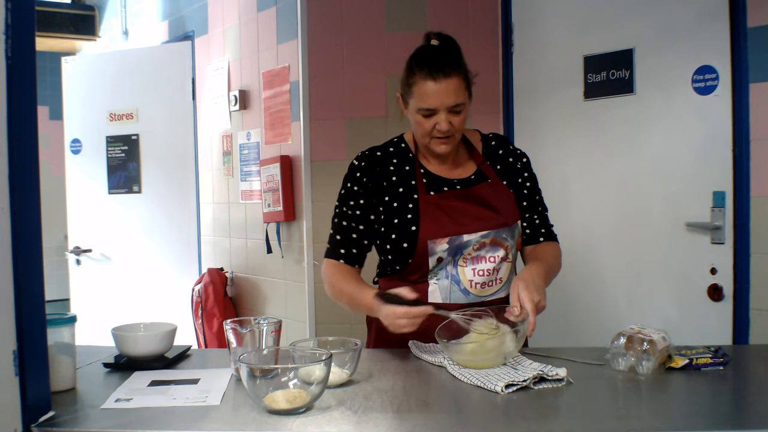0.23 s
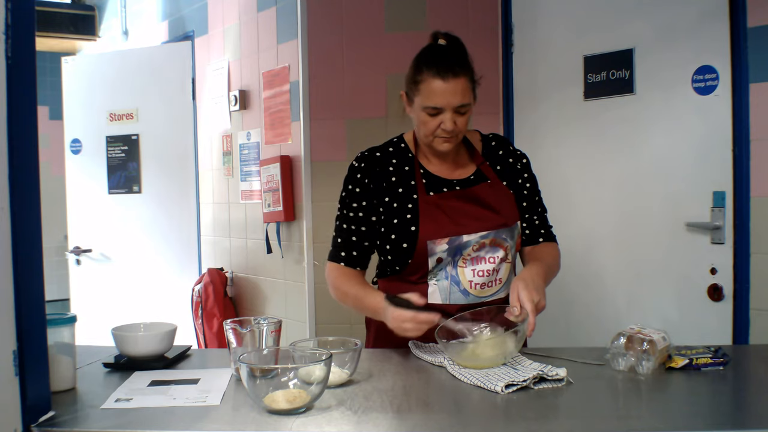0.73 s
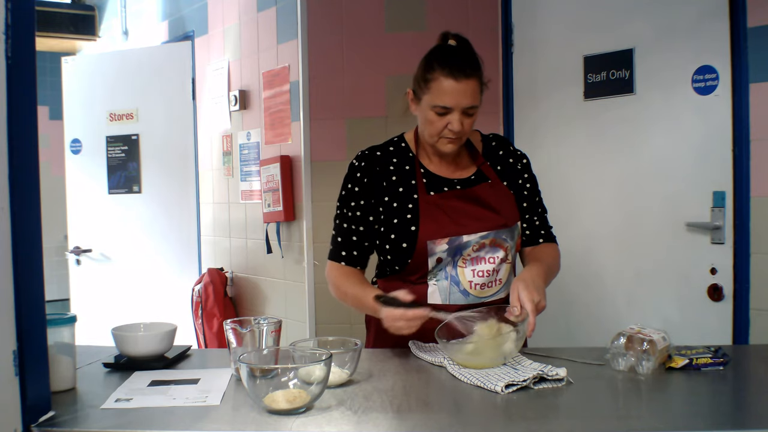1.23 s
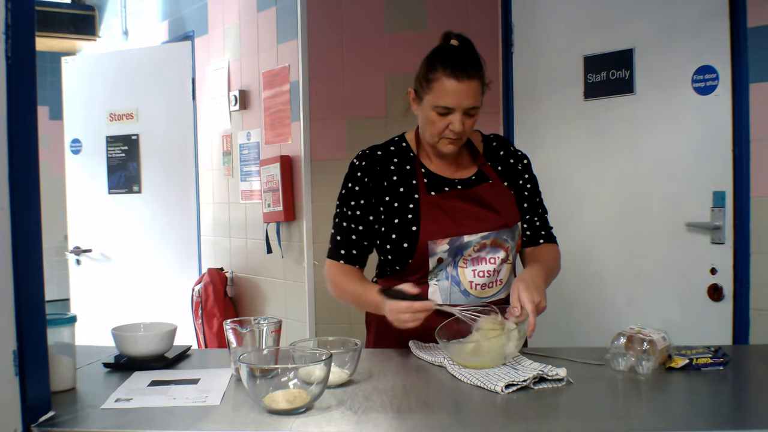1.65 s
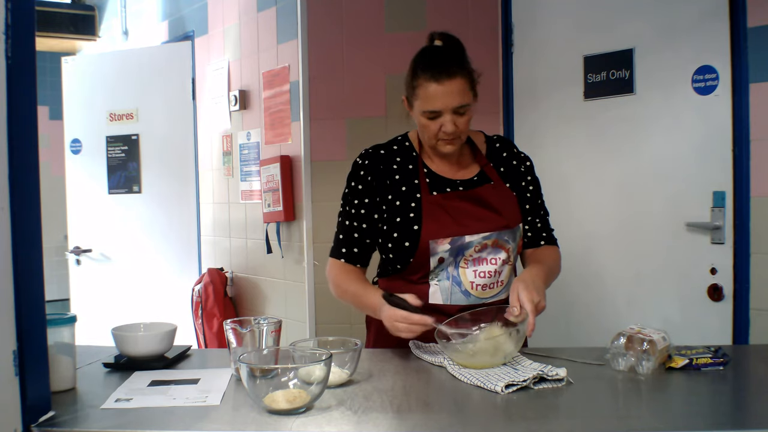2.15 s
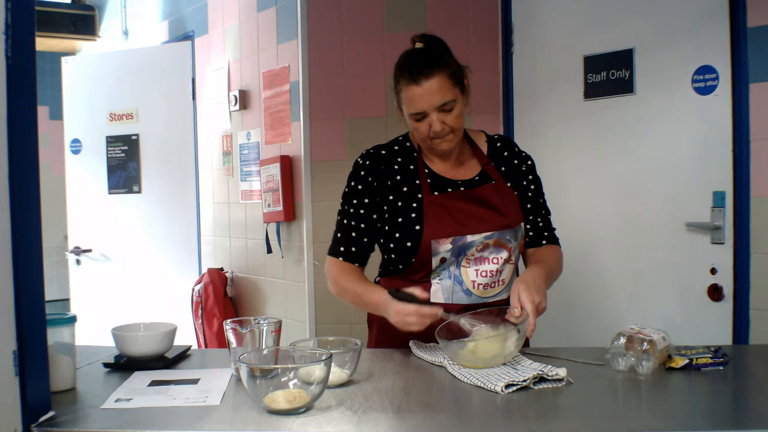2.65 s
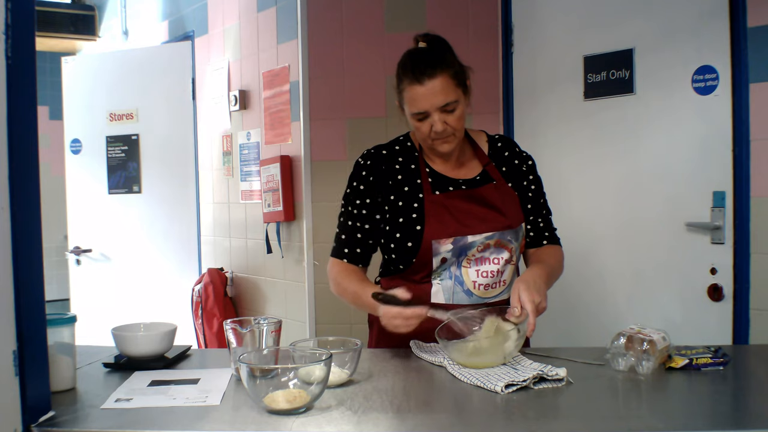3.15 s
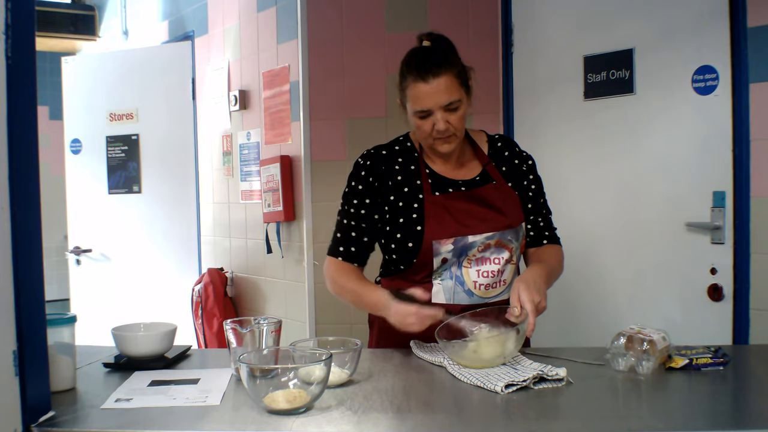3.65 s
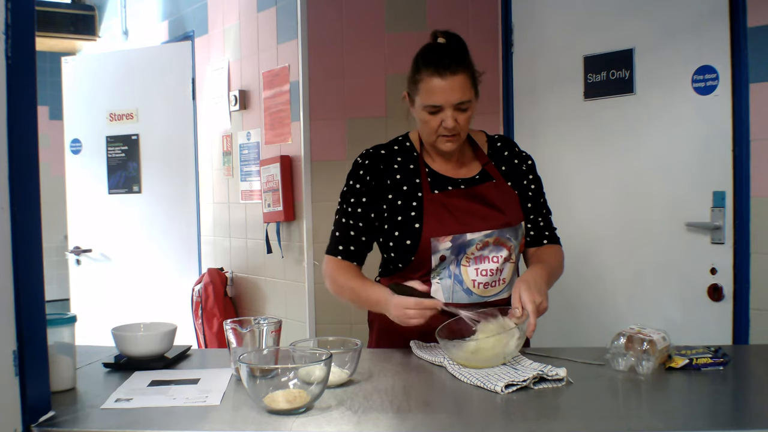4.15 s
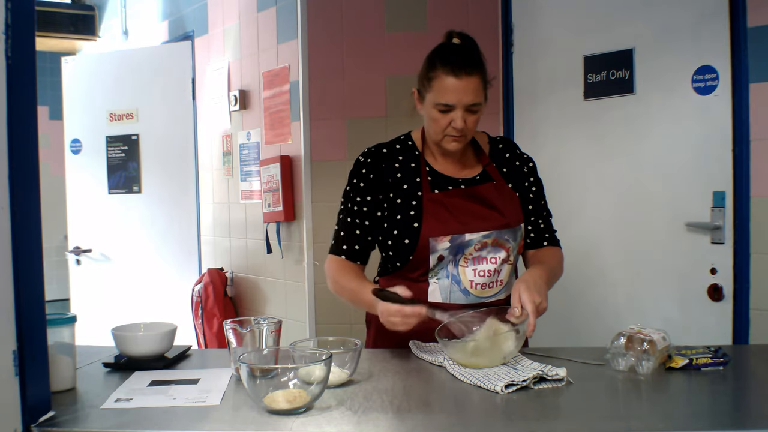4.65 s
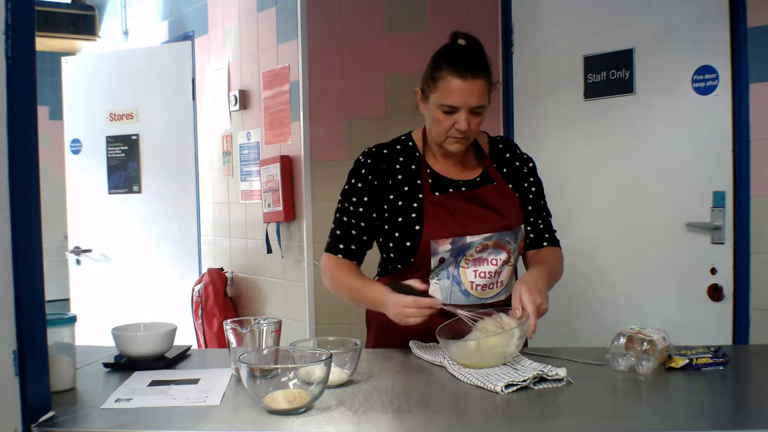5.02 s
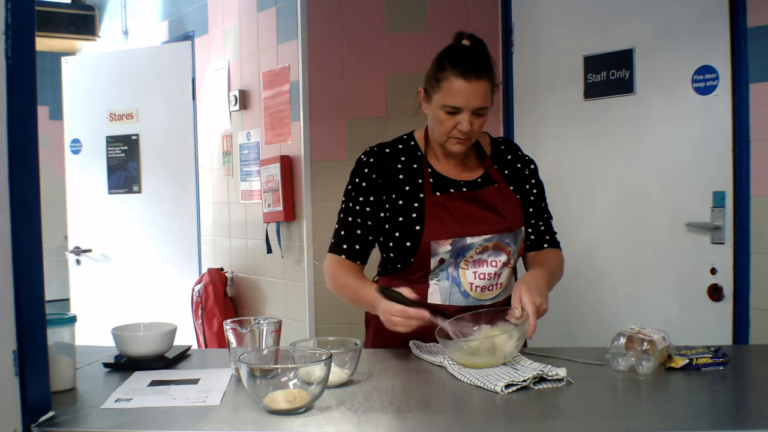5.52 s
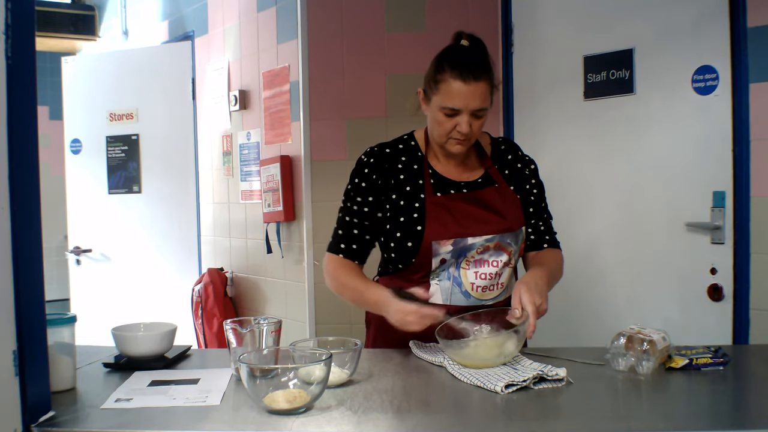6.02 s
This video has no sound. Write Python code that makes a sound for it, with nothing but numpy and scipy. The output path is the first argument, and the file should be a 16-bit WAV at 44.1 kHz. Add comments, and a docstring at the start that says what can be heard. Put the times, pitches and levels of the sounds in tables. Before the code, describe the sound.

Egg whites are beaten by hand with a wire whisk in a glass bowl set on a towel. About five strokes a second, each a bright clattering strike wrapped in wet, fizzy crackle, then a lighter flick. Small liquid plops sit beneath. The rhythm runs throughout without a pause. Hard kitchen walls add early echoes and a short bright tail, with low ventilation behind; the microphone is a short distance away.

```python
"""Over steady, low ventilation noise, egg whites are beaten by hand in a glass bowl on a towel.
On each turn a swell of random wet crackles, foam torn by the wires, starts just before the strike and peaks
after it; the wires strike and roll on the glass (noise bursts through damped resonances), air pockets ring
in the egg (short rising tones), and a lighter flick follows as the whisk swings round.
Worktop and hard walls answer each contact with early echoes, then the tiled kitchen's tail."""
import sys
import numpy as np
from scipy import signal
from scipy.fft import rfft, irfft
from scipy.io import wavfile

SR = 44100
rng = np.random.default_rng(int(sys.argv[2]) if len(sys.argv) > 2 else 0)


def log_audio(samples):
    """Write samples as a 16-bit WAV file to the path given in sys.argv[1]."""
    # one column per channel
    frames = np.atleast_2d(samples).T
    # limit to full scale, then quantise
    limited = np.clip(frames, -1, 1)
    pcm = np.round(limited * 32767).astype(np.int16)
    wavfile.write(sys.argv[1], SR, pcm)


N = 276507

# Spectral shape of the moving air: (f/Hz, relative density/dB)
AIR_SPECTRUM = [(20, -4), (32, 2), (45, -15), (80, -2), (160, -0.5), (300, -2), (500, -2.5), (800, 0.5),
                (1200, -10.5), (3000, -12.5), (8000, -39), (15000, -46)]
# Faint wavering tones of the ventilation: (f/Hz, RMS level/dB)
VENT_TONES = [(43.5, -62.5), (60, -70), (139, -71), (160, -70.5), (400, -67.5)]
# Turns of the whisk: (t/s of the strike, force level/dB before layer gain, delay of the flick/s)
TURNS = [(.055, -33, 0.058), (.27, -31.5, .043), (.472, -30, .047), (.673, -30, 0.043), (.872, -31, 0.048),
         (1.073, -32.5, 0.069), (1.276, -32, 0.053), (1.484, -34, 0.054), (1.692, -30, 0.05),
         (1.901, -31.5, 0.06), (2.112, -29.5, .054), (2.324, -27, 0.061), (2.535, -29, 0.053),
         (2.746, -33, 0.058), (2.959, -32, 0.049), (3.171, -30.5, .044), (3.377, -30.5, 0.044),
         (3.581, -27.5, 0.061), (3.793, -31, 0.054), (4.006, -30, 0.049), (4.219, -30.5, .055),
         (4.44, -31, 0.054), (4.644, -29.5, 0.06), (4.875, -29, 0.044), (5.09, -30, 0.043),
         (5.289, -30.5, 0.059), (5.509, -31.5, .054), (5.724, -33, .053), (5.944, -33.5, 0.045),
         (6.141, -34, 0.055)]
# Colour of the torn foam: (f/Hz, relative level/dB)
FOAM_COLOUR = [(250, -24), (600, -8.5), (1000, -1), (2500, 3), (5000, 5.5), (8300, -15.5), (10500, -11),
               (12500, -5), (15000, -10)]
# Resonances of the damped bowl and wire loops: (f/Hz, bandwidth/Hz, level over the plain click/dB)
RESONANCES = [(545, 47, 2), (610, 40, -1), (774, 8.1, 5.5), (830, 3.2, 16.5), (1147, 73, -1.5),
              (1254, 87, -3.5), (1384, 69, -4.5), (1715, 60, -6.5), (2050, 68, -5.5), (2125, 120, -3.5),
              (2357, 52, -1.5), (2545, 145, -5), (2938, 39, -2), (3146, 14, -20), (4350, 39, -4),
              (6045, 140, -2), (7500, 74, 2.5), (8020, 42, 5), (8800, 53, 8), (8360, 36, 10), (8970, 63, 2),
              (9640, 116, 4.5), (9800, 46, -1)]
# Kitchen reverberation: (f/Hz, T60/s, relative level/dB)
REVERBERATION = [(324, 1, -2), (676, 0.84, -1.5), (1410, 0.69, 2.5), (2780, 0.66, 0.5), (5400, 0.63, -0.5),
                 (8300, 0.46, 2), (10200, 0.27, 7), (16000, 0.46, -8)]
# Colour of the firm strike: (f/Hz, relative level/dB)
STRIKE_COLOUR = [(200, -32.5), (470, -26.5), (560, -4.5), (780, -10), (970, -9.5), (1500, -2), (2400, 2),
                 (3800, 1), (5300, -1), (6500, 3), (8400, 1), (9600, -6), (11500, -8), (14000, -38)]
# Low knock, which fades unevenly as the egg turns to foam: (t/s, level/dB before layer gain)
KNOCK_LEVEL = [(.02, -20.5), (.27, -31.5), (1.05, -26.5), (1.45, -32.5), (2.35, -27.5), (3.4, -28),
               (4, -32.5), (4.9, -30.5), (6.15, -35.5)]
# Colour of the light flick: (f/Hz, relative level/dB)
FLICK_COLOUR = [(200, -47), (470, -13), (580, -1.5), (970, -10.5), (1500, -1.5), (2400, 2), (3800, 2),
                (5300, -2.5), (6500, 0.5), (8400, -1.5), (10000, 4), (11700, -1), (14000, -15.5)]
# Treble shift of the flick: (t/s, level/dB)
FLICK_TREBLE = [(.1, 2), (1.3, 0.5), (2, -1), (2.6, 0.5), (3.9, 2.5), (4.9, 0), (5.5, 1), (5.85, -6),
                (6.2, 2.5)]

AIR_DB = -53.5  # RMS level of the moving air
TOP_HZ = 15800  # upper band limit
TURN_S = 0.19  # interval from the turn already under way to the first listed one
USUAL_DB = -30  # force of an ordinary blow

# Samples, frequencies and times of one contact with its echoes
SIZE = 32768
HZ = np.fft.rfftfreq(SIZE, 1 / SR)
T = np.arange(SIZE) / SR
LEAD_S = .025  # each strike or flick is computed from this long before its roll begins

# A firmer blow lands its wires sooner and draws more ring from them, less clack from the bowl
ROLL_S, ROLL_HALVES_DB = 0.0084, 3
RING_DB, RING_PER_DB = 4.5, 0.36
CLACK_DB, CLACK_PER_DB = .5, -0.4
STRIKE_TREBLE_DB = -3  # shift of the treble above the ring of the wires

# The flick does not follow the blow's force; a late one grazes the glass: weaker and longer
FLICK_DB, FLICK_ROLL_S, FLICK_CLACK_DB = -34, 0.0039, -1.6
LATE_S, GRAZE_DB_PER_S, GRAZE_ROLL_SHARE = 0.0582, -400, 0.71


def undb(db):
    """Logarithmic level: 20 dB is a tenfold amplitude gain."""
    return 10 ** (np.asarray(db) / 20)


def unit(x):
    """Energy normalisation: the squared samples sum to 1."""
    return x / np.sqrt(np.sum(x ** 2))


def unit_gain(spectrum):
    """Power normalisation: the mean squared gain is 1."""
    return spectrum / np.sqrt(np.mean(np.abs(spectrum) ** 2))


def level_at(t, points):
    """Linear interpolation of (t/s, level/dB) points."""
    return np.interp(t, *np.transpose(points))


def colour(points, hz):
    """Spectral envelope: (f/Hz, level/dB) points joined on a logarithmic frequency axis."""
    f, db = np.transpose(points)
    return undb(np.interp(np.log(hz + 1), np.log(f), db))


def minimum_phase(gain):
    """Minimum phase by the folded cepstrum: the response starts at once and dies fastest."""
    cepstrum = irfft(np.log(gain))
    half = len(cepstrum) // 2
    cepstrum[1:half] *= 2
    cepstrum[half + 1:] = 0
    return np.exp(rfft(cepstrum))


def shade(points):
    """Minimum-phase filtering: a smooth shift of tone from (f/Hz, level/dB) points."""
    return minimum_phase(colour(points, HZ))


def even(spectrum, amount):
    """Partial whitening: random spectral peaks are levelled while the sound is smeared in time."""
    size = np.abs(spectrum)
    inverse = (size + size.mean() / 20) ** -np.clip(amount, 0, 1)
    return unit_gain(spectrum * minimum_phase(inverse))


def add(track, s, sound):
    """Superposition: add a sound at time s, which may lie before the start."""
    i = int(s * SR)
    sound, i = sound[max(-i, 0):], max(i, 0)
    track[i:i + len(sound)] += sound[:len(track) - i]


def ventilation(waver_hz=3.6):
    """Filtered noise: a broad band gives moving air, narrow bands give wavering tones."""
    hz = np.fft.rfftfreq(N, 1 / SR)
    noise = rfft(rng.standard_normal(N))
    air = undb(AIR_DB) * unit(irfft(noise * colour(AIR_SPECTRUM, hz), N))
    for f, db in VENT_TONES:
        noise = rfft(rng.standard_normal(N))
        narrow = 1 / (1 + ((hz - f) / waver_hz) ** 2)
        air += undb(db) * unit(irfft(noise * narrow, N))
    return air * np.sqrt(N)  # from unit energy to unit RMS


def turns():
    """Repeated excitation: the whisking is under way, so one turn comes before the first listed."""
    return [(TURNS[0][0] - TURN_S, *TURNS[1][1:])] + list(TURNS)


def bowl(points):
    """Modal superposition: a coloured contact heard plainly and through the damped resonances."""
    response = 1
    for f, width, db in RESONANCES:
        response = response + undb(db) / (1 + 2j * (HZ - f) / width)
    return unit_gain(shade(points) * response)


def drag(spots, gain_db=21, peak_s=0.044, width_s=0.024, grain_db=2.5, size=8192):
    """Granular excitation: tearing foam gives a swell of tiny wet crackles around each strike."""
    out, body = np.zeros(N), bowl(FOAM_COLOUR)
    swell = np.exp(-.5 * ((T[:size] - peak_s) / width_s) ** 2)
    for s, db, _ in turns():
        near, tail = spots[rng.integers(len(spots))]
        burst_db = grain_db * np.minimum(rng.exponential(size=size), 7)
        grains = rng.standard_normal(size) * undb(burst_db)
        crackle = rfft(unit(grains * swell), SIZE)
        # starts just before the strike, peaks after it
        add(out, s - .016, undb(db + gain_db) * irfft(crackle * body * (near + tail)))
    return out


def kitchen(early_db=5, early_s=.016, fade_s=0.04, tail_db=0, build_s=0.0078, evenness=0.47, count=60):
    """Room acoustics: direct sound and early echoes (near), then a banded exponential tail, as spectra."""
    # worktop and close walls
    early = np.zeros(SIZE)
    lags = .001 + early_s * rng.random(count)
    early[(lags * SR).astype(int)] = rng.standard_normal(count) * np.exp(-lags / fade_s)
    near = undb(early_db) * unit(early)
    near[0] += 1  # direct sound
    # many small surfaces smear the sound in time more than they colour it
    near = even(rfft(near), evenness)

    centres = np.log([row[0] for row in REVERBERATION])
    noise, tail = rfft(rng.standard_normal(SIZE)), 0
    for pick, (_, t60, db) in zip(np.eye(len(REVERBERATION)), REVERBERATION):
        band = irfft(noise * np.interp(np.log(HZ + 1), centres, pick))
        tail = tail + undb(db) * band * np.exp(-np.log(1000) * T / t60)
    build_up = 1 - np.exp(-T / build_s)
    return near, undb(tail_db - 6) * rfft(unit(tail * build_up))


def wires(roll_s, scatter_db, chatter_s, bite_s, slip_db=3, count=7, size=4096, slip_size=32):
    """Stick-slip contact: loops land in turn, bite through foam and chatter on glass; a force spectrum."""
    lands = (np.arange(count) + rng.random(count)) / count * max(roll_s, .002)
    force = undb(scatter_db * rng.standard_normal(count))
    age = T[:size] - LEAD_S - lands[:, None]
    # each loop's force rises over bite_s and decays over chatter_s; powers add
    grip = force ** 2 @ np.exp(-2 * np.maximum(age / chatter_s, -age / bite_s))
    # wet wire sticks and slips on glass: the force jumps more than once a millisecond
    slips = np.repeat(undb(slip_db * rng.standard_normal(size)), slip_size)[:size]
    return rfft(unit(np.sqrt(grip) * slips * rng.standard_normal(size)), SIZE)


def touch(patchy_db, low_hz=1200, high_hz=9000, count=14):
    """Local contact response: each meeting of wires and glass has its own bright and dull bands."""
    f = np.geomspace(low_hz, high_hz, count)
    db = patchy_db * rng.standard_normal(count) * np.hanning(count) ** .5
    return shade(np.transpose([f, db]))


def heard(blow, edge, spot, near_evenness=0.12, room_evenness=0.47):
    """Diffuse blending: near sound keeps the blow's colour, the room returns all directions more evenly."""
    near, tail = spot
    return even(blow, near_evenness) * edge * near + even(blow, room_evenness) * tail


def knock_level(s):
    """Interpolated level/dB of the low knock at time s, ordinary before the first point."""
    return np.interp(s, *np.transpose(KNOCK_LEVEL), left=USUAL_DB)


def strikes(spots, gain_db=32, chatter_s=0.0069, bite_s=0.0023):
    """Force-dependent impact: the firm blow's force sets how fast the wires land and how they sound."""
    out, body = np.zeros(N), bowl(STRIKE_COLOUR)
    for s, db, _ in turns():
        spot = spots[rng.integers(len(spots))]
        firm_db = db - USUAL_DB
        roll_s = ROLL_S * .5 ** (firm_db / ROLL_HALVES_DB)
        blow = wires(roll_s, scatter_db=2.0, chatter_s=chatter_s, bite_s=bite_s)
        knock_db = knock_level(s) - db  # cancels the blow's level in the knock band
        clack_db = CLACK_DB + CLACK_PER_DB * firm_db
        ring_db = RING_DB + RING_PER_DB * firm_db
        landing = shade([(480, 0), (560, knock_db), (850, knock_db),
                         (1200, clack_db), (3000, clack_db), (4000, 0)])
        edge = shade([(7300, 0), (8100, ring_db), (8600, ring_db), (9300, STRIKE_TREBLE_DB)])
        sound = body * landing * heard(blow, edge * touch(patchy_db=2.0), spot)
        add(out, s - LEAD_S, undb(db + gain_db) * irfft(sound))
    return out


def slop(spots, gain_db=-7, low_hz=570, high_hz=820, cycles=7, glide=0.068, spread_s=0.017, count=5, size=2048):
    """Bubble resonance: air pockets beaten into the egg ring for a few cycles, rising slightly."""
    out, t = np.zeros(N), T[:size]
    for s, *_ in TURNS:
        for when, pitch, strength in rng.random((count, 3)):
            hz = low_hz + pitch * (high_hz - low_hz)
            age = t * hz / cycles
            phase = 2 * np.pi * hz * t * (1 + glide * np.tanh(age))
            pocket = np.sin(phase) * np.exp(-2 * age)
            gain = (1 + strength) / 2 * undb(knock_level(s) + gain_db)
            add(out, s - .004 + spread_s * when ** 2, gain * pocket)
    # the small bowl radiates little below its lowest resonance
    out = signal.sosfilt(signal.butter(8, 520, "high", fs=SR, output="sos"), out)
    return signal.fftconvolve(out, irfft(sum(spots[0])))[:N]


def flicks(spots, gain_db=31, chatter_s=0.0036, bite_s=0.0021):
    """Grazing impact: a thinner tick as the whisk swings round, weaker and longer when late."""
    out = np.zeros(N)
    body = bowl(FLICK_COLOUR) * shade([(3000, FLICK_CLACK_DB), (4000, 0)])
    for s, _, after_s in turns():
        spot = spots[rng.integers(len(spots))]
        late_s = max(after_s - LATE_S, 0)
        roll_s = FLICK_ROLL_S + GRAZE_ROLL_SHARE * late_s
        blow = wires(roll_s, scatter_db=9.0, chatter_s=chatter_s, bite_s=bite_s)
        db = FLICK_DB + GRAZE_DB_PER_S * late_s
        edge = shade([(7000, 0), (9500, level_at(s, FLICK_TREBLE))])
        sound = body * heard(blow, edge * touch(patchy_db=1.6), spot)
        add(out, s + after_s - LEAD_S, undb(db + gain_db) * irfft(sound))
    return out


def scene(count=5):
    """Superposition of sources: the whisk lands on a few spots, each with its own pattern of echoes."""
    spots = [kitchen() for _ in range(count)]
    mix = ventilation() + drag(spots) + strikes(spots) + slop(spots) + flicks(spots)
    return mix[None]


def record(dry):
    """Band limiting: a steep elliptic low-pass cuts the top."""
    return signal.sosfilt(signal.ellip(10, .2, 80, TOP_HZ, fs=SR, output="sos"), dry)


dry = scene()
out = record(dry)
log_audio(out)
```